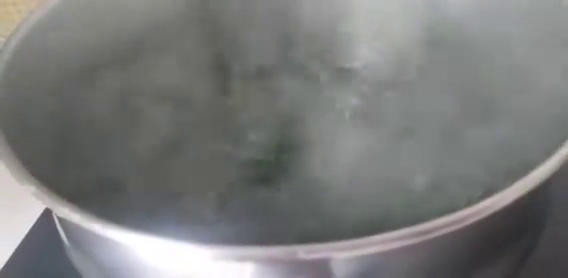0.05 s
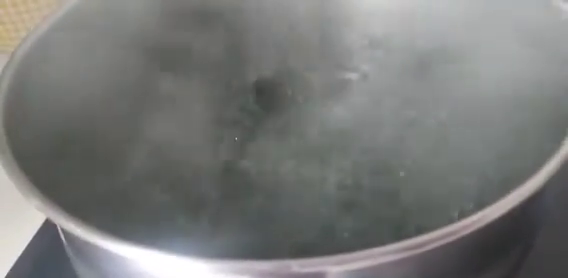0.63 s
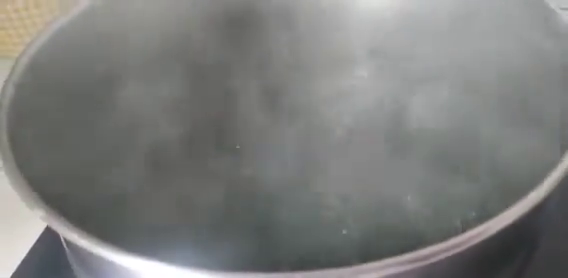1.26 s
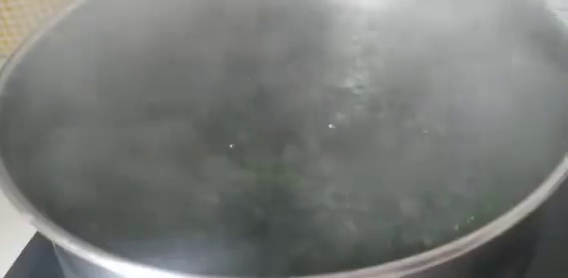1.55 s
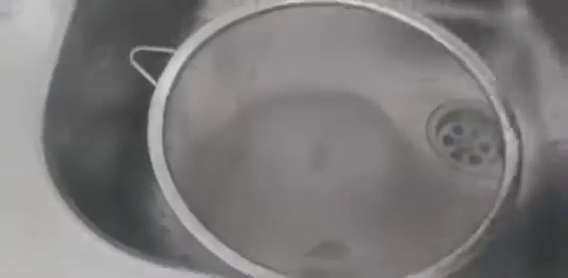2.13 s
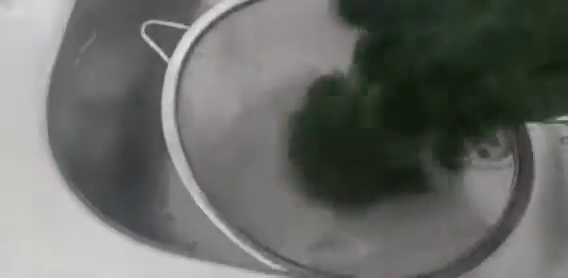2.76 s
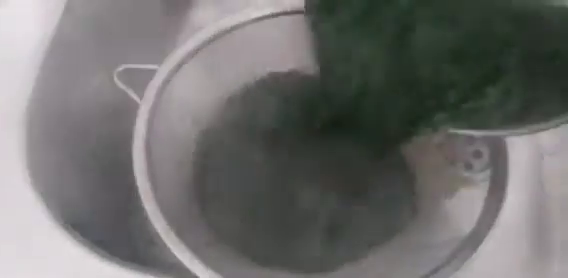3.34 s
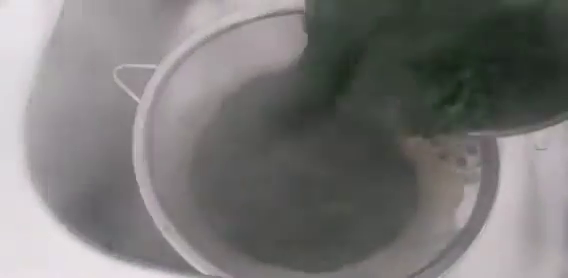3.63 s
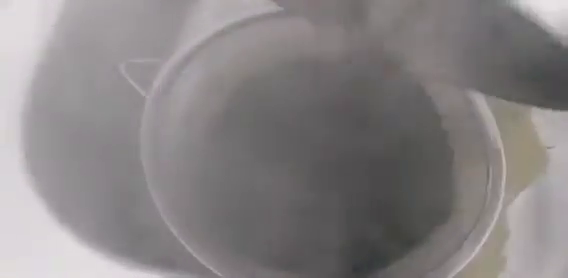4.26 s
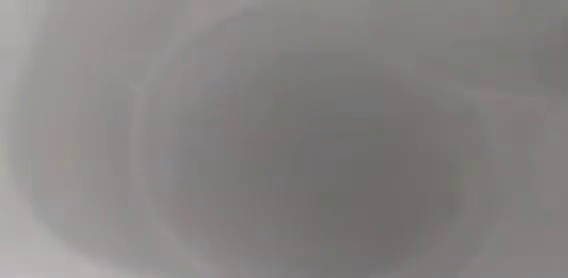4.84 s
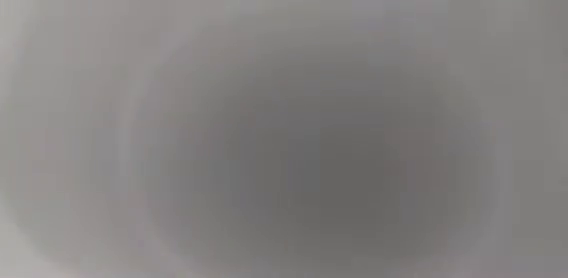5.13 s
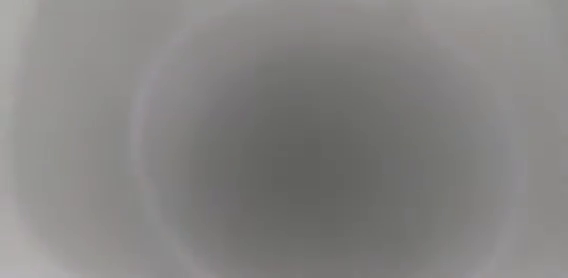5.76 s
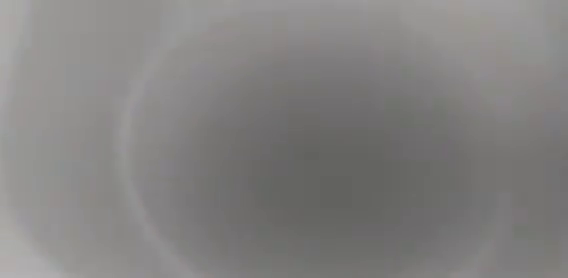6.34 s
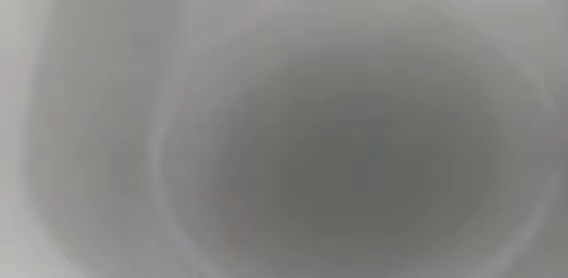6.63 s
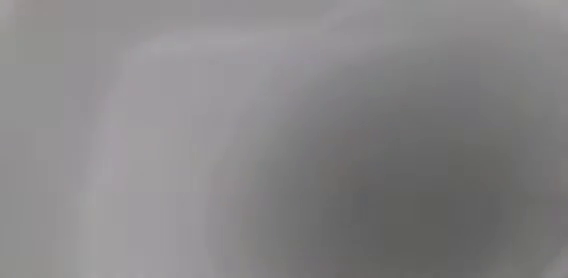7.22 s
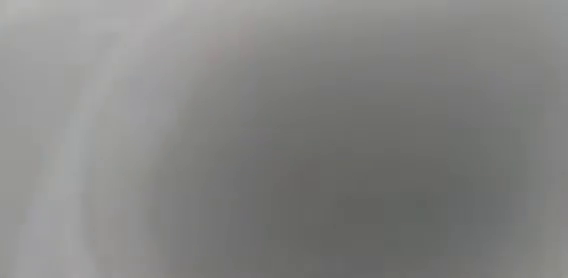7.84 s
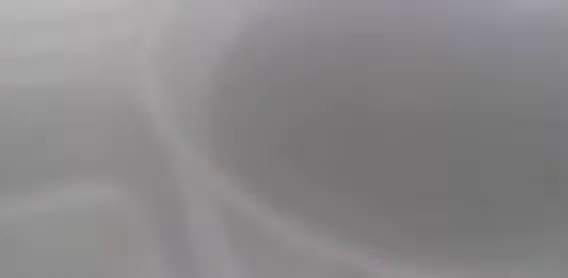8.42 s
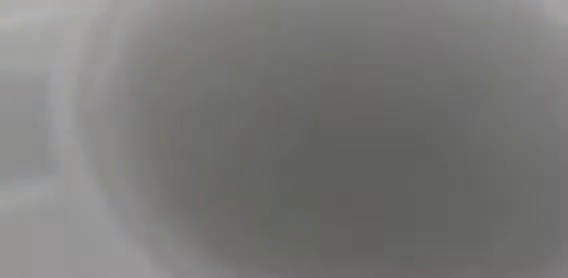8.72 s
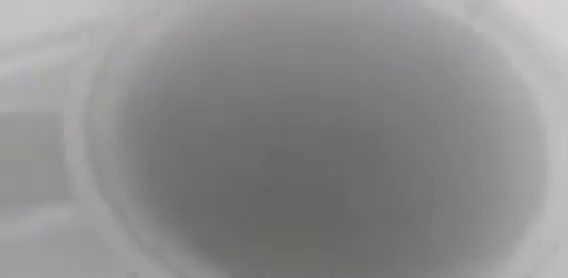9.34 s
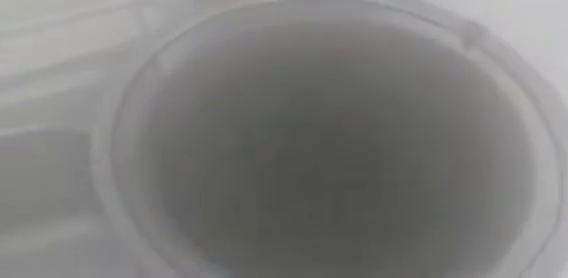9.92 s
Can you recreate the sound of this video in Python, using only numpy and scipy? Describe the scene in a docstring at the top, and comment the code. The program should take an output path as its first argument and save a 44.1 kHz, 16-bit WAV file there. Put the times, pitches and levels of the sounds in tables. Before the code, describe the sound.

Greens boil softly in a steel pot, fizzing and popping. The sound cuts to a kitchen sink with a low motor hum. Wet leaves slap and squelch into a colander, and water gurgles down the drain. The empty pot lands with a loud, ringing double clang. The colander knocks a few times, then scrapes and bumps along the sink as water trickles. Everything sounds close, with a little room echo.

```python
"""Spinach boils hard in a steel pot, fizzing, rumbling and popping as its bubbles ring and burst.
The scene changes to a sink in a humming kitchen: wet leaves slap into a colander and water gurgles away.
The empty pot lands with a clang, its modes ringing so loudly that the gain control ducks.
Then the colander is tapped, shaken and dragged, and impact and friction excite the steel's resonances."""
import sys
import numpy as np
from scipy import signal
from scipy.fft import rfft, irfft
from scipy.io import wavfile
from scipy.ndimage import uniform_filter1d

SR = 44100
rng = np.random.default_rng(int(sys.argv[2]) if len(sys.argv) > 2 else 0)


def dump_mix(stems):
    """Bounce the given channels to the path in sys.argv[1] as a 16-bit WAV at rate SR."""
    frames = np.atleast_2d(stems).T  # one column per channel
    limited = np.clip(frames, -1, 1)  # hard clip at full scale
    pcm = np.round(limited * 32767).astype(np.int16)
    wavfile.write(sys.argv[1], SR, pcm)


N = 440100
TIME = np.arange(N) / SR
BOIL_END_S, SINK_START_S = 1.978, 2.075


def undb(db):
    """Decibels to amplitude ratio."""
    return 10 ** (np.asarray(db) / 20)


def unit(x):
    """Normalise to an rms of one."""
    return x / np.sqrt(np.mean(x ** 2) + 1e-18)


def curve(rows):
    """Amplitude envelope through (s, dB) points, silent outside them."""
    s, db = np.transpose(rows)
    return undb(np.interp(TIME, s, db, left=-np.inf, right=-np.inf))


def shape(f, points):
    """Spectral envelope through (Hz, dB) points, as gain at frequencies f."""
    hz, db = np.transpose(points)
    return undb(np.interp(np.log(f + 1), np.log(hz), db))


def resonance(f, hz, width):
    """Complex response of a damped oscillator, gain one at its centre."""
    return 1j * f * width / (hz ** 2 - f ** 2 + 1j * f * width)


def colour(x, response):
    """Filter x by a frequency response and normalise it."""
    return unit(irfft(rfft(x) * response(np.fft.rfftfreq(len(x), 1 / SR)), len(x)))


def walk(rate_hz, samples=N):
    """Low-passed noise: a smooth random wander with an rms of one."""
    return colour(rng.standard_normal(samples), lambda f: np.exp(-f / rate_hz))


def fade(t, t60):
    """Exponential decay of 60 dB in t60 seconds."""
    return np.exp(-np.log(1000) * t / t60)


def add(track, s, sound):
    """Superpose a sound on the track from time s."""
    start = int(s * SR)
    track[start:start + len(sound)] += sound[:N - start]


def burst(response, t60, rise, grain_db=0):
    """Many tiny impacts merge into decaying, filtered noise whose onset has an rms near one."""
    t = TIME[:SR // 2]
    noise, size = rng.standard_normal((2, len(t)))
    clumps = undb(grain_db * np.tanh(np.repeat(size, 30)[:len(t)]))
    envelope = fade(t, t60) * (1 - np.exp(-t / rise))
    cloud = colour(noise * clumps, response) * envelope
    return cloud * np.linalg.norm(envelope) / envelope.max() / np.linalg.norm(cloud)


def bubbles(rate, low_hz, high_hz, cycles, spread_db, glide, seconds=N / SR):
    """Bubble resonance: each random gas pocket rings as a damped sine of rising pitch."""
    out = np.zeros(N)
    for when, pitch, size, life in rng.random((int(rate * seconds), 4)):
        hz = low_hz * (high_hz / low_hz) ** pitch
        t60 = cycles * (.5 + life) / hz
        t = TIME[:int(t60 * SR) + 2]
        gain = undb(-spread_db * np.log(max(size, .02)))
        phase = 2 * np.pi * hz * t * (1 + glide * t / t60)
        add(out, when * seconds, gain * fade(t, t60) * np.sin(phase))
    return unit(out) * np.sqrt(seconds * SR / N)


def crackle(rate, spread_db, smear_t60):
    """Shot noise: random clicks of uneven size, each with a short noisy tail."""
    clicks = (rng.random(N) < rate / SR) * rng.choice([-1, 1], N)
    clicks = clicks * undb(spread_db * np.minimum(rng.exponential(size=N), 4))
    energy = signal.fftconvolve(clicks ** 2, fade(TIME[:2048], smear_t60) ** 2)[:N]
    tails = np.sqrt(abs(energy)) * rng.standard_normal(N)
    return unit(unit(clicks) + unit(tails))


def scatter(start, end, rate, db, hz, spread_db=1.5, octaves=0.56):
    """A jittered train of events, as rows of (s, dB, Hz) around a typical level and pitch."""
    chance = rng.random((int((end - start) * rate), 3))
    return [(start + (k + late) / rate, db + spread_db * (1 - 2 * soft),
             hz * 2 ** (octaves * (2 * pitch - 1))) for k, (late, soft, pitch) in enumerate(chance)]


def room(x, wet_db, t60):
    """Reverberation: reflections from hard walls close by add a diffuse tail."""
    t = TIME[:SR // 2]
    tail = rng.standard_normal(len(t)) * fade(t, t60) * (1 - np.exp(-t / 0.0015))
    return x + undb(wet_db) * signal.fftconvolve(x, tail / np.linalg.norm(tail))[:N]


# Spectrum of the boiling. Each row: frequency in Hz, level in dB.
BOIL_SPECTRUM = [(18, -45), (30, -13), (103, 15.5), (184, -1), (303, 8), (345, -4.5), (632, 3), (988, -6.5),
                 (1430, 1.5), (1810, -6.5), (5040, -9.5), (6550, -10.5), (8740, -34), (16000, -26.5)]
# The biggest steam bubbles bursting. Each row: start in seconds, relative level in dB, centre in Hz.
STEAM_POPS = [(0.078, -35.5, 1450), (0.202, -35.5, 6050), (0.223, -32.5, 1770), (0.324, -26.5, 2900),
              (0.425, -31.5, 2280), (0.452, -34, 6500), (0.523, -29.5, 1320), (0.859, -29.5, 1670),
              (1.037, -35.5, 1600), (1.141, -34.5, 5530), (1.202, -36.5, 5500), (1.326, -32.5, 1400),
              (1.42, -32, 1400), (1.772, -36.5, 4400), (1.796, -35, 1500), (1.931, -34, 985)]

def boiling(fizz_db=-51, surge_db=2, simmer_db=-50, spatter_db=-69, pop_db=1):
    """Bubble resonance: tiny bubbles fizz, larger ones ring, droplets spatter and the biggest burst."""
    froth = bubbles(4200, 46.7, 15000, cycles=2.2, spread_db=-0.5, glide=0.062, seconds=BOIL_END_S)
    # small bubbles die sooner and spread over more treble; weighting by frequency evens that out
    fizz = colour(froth, lambda f: f * shape(f, BOIL_SPECTRUM)) * undb(surge_db * walk(36))
    simmer = bubbles(200, 1000, 6000, cycles=24, spread_db=3.6, glide=.04, seconds=BOIL_END_S)
    spatter = bubbles(49, 7100, 15000, cycles=21, spread_db=5.5, glide=.03, seconds=BOIL_END_S)
    out = undb(fizz_db) * fizz + undb(simmer_db) * simmer + undb(spatter_db) * spatter
    small_pops = scatter(0, BOIL_END_S, rate=11, db=-38, hz=2610, octaves=1)
    for s, db, hz in STEAM_POPS + small_pops:
        spit = burst(lambda f: shape(f, BOIL_SPECTRUM) * (0.096 + resonance(f, hz, 0.42 * hz)),
                     t60=0.05, rise=0.00081, grain_db=-0.5)
        add(out, s, undb(db + pop_db) * spit)
    return room(out, wet_db=-5.5, t60=0.034)


# Partials of a kitchen motor. Each row: frequency in Hz, rms level in dB.
MOTOR_PARTIALS = [(100, -45), (157.5, -57.5), (200, -61), (316.5, -55), (474, -67.5)]
# Spectrum of the room's air. Each row: frequency in Hz, level in dB.
AIR_SPECTRUM = [(18, -54.5), (30, -45), (43, -14), (71, -18), (103, 3), (204, -21), (319, -1.5),
                (404, -12.5), (473, -14.5), (1590, -29.5), (3670, -27), (6550, -33.5), (8520, -53),
                (16000, -40.5)]

def kitchen(air_db=-52, waver_db=1):
    """Slow amplitude and phase modulation make a motor's hum waver over broadband room noise."""
    out = undb(air_db) * colour(rng.standard_normal(N), lambda f: shape(f, AIR_SPECTRUM))
    for hz, db in MOTOR_PARTIALS:
        amplitude = np.sqrt(2) * undb(db + waver_db * walk(6))
        out += amplitude * np.sin(2 * np.pi * hz * TIME + walk(7.2) * hz / 700)
    return out


# Spectrum of the wet leaves. Each row: frequency in Hz, level in dB.
WET_SPECTRUM = [(150, -30), (330, -5.5), (600, -0.5), (1200, -12), (1900, -3.5), (3000, -7.5), (5000, 0),
                (6700, 0.5), (8000, -15), (9500, -17), (14000, -8.5), (16000, -14)]
# Heavy clumps landing. Each row: start in seconds, level in dB, centre in Hz, t60 in seconds.
LEAF_SPLATS = [(2.567, -41.5, 4320, 0.66), (2.714, -31, 8700, 0.21), (2.734, -26.5, 4670, 0.14),
               (2.844, -33, 3800, 0.11), (2.916, -20.5, 7030, 0.031), (2.935, -19.5, 2240, 0.064),
               (2.963, -13.5, 4070, 0.024), (3.015, -29, 5030, 0.16), (3.153, -33, 3300, 0.12),
               (3.187, -20, 3340, 0.032), (3.243, -27, 1370, 0.15), (3.262, -21.5, 3500, 0.026),
               (3.319, -28.5, 3960, 0.093), (3.331, -25.5, 9650, 0.024), (3.422, -25.5, 3950, 0.062),
               (3.464, -21, 5530, 0.026), (3.555, -33, 2300, 0.089), (3.601, -30.5, 2500, 0.17),
               (3.779, -33, 9600, 0.024), (3.871, -30.5, 3860, 0.078), (3.935, -22.5, 3980, 0.03),
               (4.027, -28, 7150, 0.031), (4.21, -24.5, 6200, 0.048), (4.982, -34.5, 5230, 0.022),
               (8.219, -30.5, 4750, 0.11)]
# Two crackle envelopes: the leaves slide out, and later the colander is moved.
# Each row: time in seconds, relative level in dB.
CRACKLE_ENVELOPES = [
    [(2.6, -53), (2.76, -44.5), (3.08, -44.5), (3.43, -45), (3.67, -54), (4.16, -46), (4.38, -57),
     (5.3, -64)],
    [(7.3, -68.5), (7.95, -57.5), (8.24, -48), (8.39, -50), (8.63, -48), (8.87, -64), (9.46, -64.5),
     (9.97, -52)],
]
# Stretches in which small shreds drop. Each row: start and end in seconds.
SHRED_SPANS = [(2.75, 3.7), (7.98, 8.22)]

def leaves(tick_db=-4, squelch_db=-7):
    """Damped impacts: wet clumps and shreds slap down while leaves crackle and trapped air squelches."""
    def slap(hz, t60):
        return burst(lambda f: shape(f, WET_SPECTRUM) * (0.54 + resonance(f, hz, 0.6 * hz)),
                     t60, rise=0.00035, grain_db=4)

    ticks = colour(crackle(rate=500, spread_db=4, smear_t60=0.058), lambda f: shape(f, WET_SPECTRUM))
    squelch = bubbles(410, 2300, 7000, cycles=26, spread_db=4, glide=.04)
    out = undb(tick_db) * ticks + undb(squelch_db) * squelch
    for start, end in SHRED_SPANS:
        for s, db, hz in scatter(start, end, rate=14, db=11.5, hz=3180):  # dB above the envelope
            add(out, s, undb(db) * slap(hz, t60=0.06))
    out *= sum(curve(rows) for rows in CRACKLE_ENVELOPES)
    for s, db, hz, t60 in LEAF_SPLATS:
        add(out, s, undb(db) * slap(hz, t60))
    return room(out, wet_db=-9.5, t60=0.17)


# Two envelopes of water running into the drain. Each row: time in seconds, relative level in dB.
FLOW_ENVELOPES = [
    [(2.6, -53.5), (3.1, -52.5), (3.84, -63), (4.57, -48.5), (4.91, -60), (5.28, -52)],
    [(7.2, -60), (7.358, -62.5), (7.612, -58.5), (7.926, -52.5), (8.048, -51), (8.36, -52.5)],
]
# Gulps of air. Each row: start in seconds, relative level in dB, first pitch in Hz, length in seconds.
AIR_GULPS = [(4.479, -44, 1290, 0.022), (4.532, -44, 990, 0.02), (4.585, -34.5, 1060, 0.019),
             (4.747, -34, 608, 0.017), (4.936, -35, 573, 0.02), (4.953, -36.5, 1907, 0.012),
             (5.02, -39, 520, 0.024), (5.091, -39, 490, 0.022), (5.133, -40.5, 826, 0.017),
             (5.216, -40, 472, 0.042), (5.257, -47, 1900, 0.013), (8.877, -48, 2900, 0.015)]

def drain(trickle_db=-4, gulp_db=-1, octaves_per_s=22):
    """Water trickles and the sink rumbles; each gulp's resonance rises as its air pocket closes."""
    flow = sum(curve(rows) for rows in FLOW_ENVELOPES)
    out = undb(trickle_db) * flow * bubbles(600, 400, 3200, cycles=12, spread_db=2, glide=.08)
    for s, db, start_hz, length in AIR_GULPS:
        progress = np.linspace(0, 1, int(length * SR))
        hz = start_hz * 2 ** (octaves_per_s * length * progress)
        wobble = 1 + .35 * walk(250, SR // 10)[:len(progress)]
        gulp = np.sin(np.pi * progress) * wobble * np.sin(2 * np.pi * np.cumsum(hz) / SR)
        add(out, s, undb(db + gulp_db) * gulp)
    rumble = colour(rng.standard_normal(N), lambda f: resonance(f, 130, 290) ** 2)
    return room(out, wet_db=-6.5, t60=0.33) + flow * rumble


# Bumps on the sink floor.
# Each row: start in seconds, relative level in dB, centre and bandwidth in Hz, t60 in seconds.
FLOOR_BUMPS = [(2.708, -31.5, 320, 34, 0.32), (8.396, -40.5, 427, 370, 1), (8.485, -31.5, 400, 295, 0.17),
               (8.539, -24, 350, 209, 0.076), (8.667, -31.5, 403, 390, 0.07), (8.72, -44, 428, 447, 0.35),
               (9.093, -48, 330, 150, 0.058)]

def sink_floor(bump_db=1):
    """Plate resonance: the sink floor answers each blow with a dull band of decaying noise."""
    out = np.zeros(N)
    for s, db, hz, width, t60 in FLOOR_BUMPS:
        add(out, s, undb(db + bump_db) * burst(lambda f: resonance(f, hz, width) ** 2, t60, rise=.007))
    return room(out, wet_db=-5, t60=0.27)


# Modes of the pot. Each row: frequency in Hz, t60 in seconds for a blow on the rim,
# relative level in dB when the base strikes, and when the rim strikes.
POT_MODES = [(160, .28, -22, -25), (222, .33, -19, -19), (323, .2, -5, -31), (454, .28, -48, -18),
             (477, .35, -30, -25), (544, .42, -29, -20), (678, .4, -32, -26), (720, .33, -40, -26),
             (762, .4, -30, -28), (829, .38, -49, -25), (1260, .27, -29, -27), (1478, .3, -45, -18),
             (1509, .35, -36, -25), (2295, .28, -26, -29), (2325, .32, -23, -24), (2668, .33, -33, -25),
             (3385, .29, -56, -23), (3490, .36, -28, -21), (3533, .2, -8, -34), (4445, .3, -26, -22),
             (4790, .33, -33, -22), (5740, .28, -25, -26), (6770, .24, -26, -30), (7548, .22, -33, -42)]
# The pot lands. Each row: start in seconds, ring gain in dB, contact (0 base, 1 rim), clash level in dB.
POT_LANDINGS = [(5.33, 15, 0.18, -4), (5.406, 7.5, 0.23, -6), (5.624, 14, 0.98, 4), (5.644, -1, 0.55, -4.5)]
# Spectrum of clashing sheet steel. Each row: frequency in Hz, level in dB.
CLASH_SPECTRUM = [(25, -50), (45, -28.5), (70, 3), (110, -2.5), (160, -4), (220, 5.5), (270, -8),
                  (450, 1.5), (750, 4), (950, -7.5), (1500, -7.5), (2050, -11.5), (2600, -5), (3050, -16.5),
                  (3500, -8), (4900, -6), (7000, -15.5), (8500, -43), (16000, -43.5)]

def pot(clash_t60=0.31, crack_db=-17, base_damping=0.11, rattle=0.3):
    """Modal vibration: the contact point weights the pot's modes, over a clash and a bright crack."""
    out, t = np.zeros(N), TIME[:SR]
    attack = 1 - np.exp(-t / 0.0015)
    for s, ring_db, contact, clash_db in POT_LANDINGS:
        life = 1 - base_damping * (1 - contact)  # a blow on the base dies sooner than one on the rim
        for hz, t60, base_db, rim_db in POT_MODES:
            flutter = 1 + rattle * walk(50, SR)  # the pot rocks against the sink
            mode = flutter * attack * fade(t, t60 * life) * np.sin(2 * np.pi * (hz * t + rng.random()))
            add(out, s, undb(ring_db + base_db + contact * (rim_db - base_db)) * mode)
        clash = burst(lambda f: shape(f, CLASH_SPECTRUM), clash_t60 * life, rise=0.00068, grain_db=2.5)
        crack = burst(lambda f: shape(f, WET_SPECTRUM), t60=0.094, rise=0.00018)
        add(out, s, undb(clash_db) * clash + undb(ring_db + crack_db) * crack)
    return room(out, wet_db=-17, t60=0.59)


# The colander knocks on the sink. Each row: start in seconds, level in dB, t60 in seconds.
COLANDER_TAPS = [(6.228, -47, 0.062), (6.351, -22, .055), (6.415, -40, 0.17), (6.493, -21, 0.032),
                 (6.555, -36.5, 0.077), (6.907, -18.5, 0.06), (6.93, -45.5, 0.77), (7.01, -41.5, 0.7),
                 (7.107, -33.5, 0.097), (9.495, -52, 0.073)]
# Spectrum of a knock. Each row: frequency in Hz, level in dB.
KNOCK_SPECTRUM = [(150, -24.5), (330, -3), (520, -16), (720, -3.5), (950, -10), (1300, -10), (4800, -10.5),
                  (7000, -11), (8700, -31.5), (16000, -23.5)]
# Modes of the colander. Each row: frequency and bandwidth in Hz, weight in dB (halved when played).
COLANDER_MODES = [(700, 89, -5.5), (1360, 54, -2), (1913, 36, -15), (3250, 35, -21), (3970, 45, -10),
                  (4950, 69, -6), (5800, 25, -16)]
# Shoves along the sink. Each row: time of the peak in seconds, level in dB, seconds to swell by 60 dB.
COLANDER_SHOVES = [(8.402, -34.5, 0.15), (8.508, -36, 0.4), (8.675, -45.5, 0.1), (8.78, -51, 0.16)]
# Resonances that rubbing excites. Each row: frequency and bandwidth in Hz, relative level in dB.
FRICTION_MODES = [(1498, 63, -9.5), (2690, 110, -6), (3530, 75, -2), (4520, 190, -2), (5400, 510, -15),
                  (6820, 1200, -8), (7450, 260, -2)]

def colander(ring_db=7, scrape_t60=0.14):
    """Impact and friction excite resonances: the colander knocks, then scrapes along the sink."""
    def knocked(f):
        modes = sum(undb(db / 2) * resonance(f, hz, width) for hz, width, db in COLANDER_MODES)
        return shape(f, KNOCK_SPECTRUM) * (1 + undb(ring_db) * modes)

    def rubbed(f):
        modes = sum(undb(db) * resonance(f, hz, width) ** 2 for hz, width, db in FRICTION_MODES)
        return 0.37 * shape(f, WET_SPECTRUM) + modes

    shoves = sum(undb(db) * fade(abs(TIME - s), np.where(TIME < s, swell, scrape_t60))
                 for s, db, swell in COLANDER_SHOVES)
    out = shoves * colour(crackle(rate=1500, spread_db=-2, smear_t60=0.0076), rubbed)
    for s, db, t60 in COLANDER_TAPS:
        add(out, s, undb(db) * burst(knocked, t60, rise=0.0019, grain_db=6))
    return room(out, wet_db=-5, t60=0.27)


# Treble difference between the microphone's two ports.
# Each row: frequency in Hz, side relative to mid in dB before the bearing scales it.
SIDE_SPECTRUM = [(500, -50), (2400, -43), (4500, -22), (8000, -10), (15000, -11)]

def scene():
    """Superposition in mid-side stereo: the stove, a moment of silence, then the sink."""
    at_stove = np.clip((BOIL_END_S - TIME) / 0.0078, 0, 1)
    at_sink = np.clip((TIME - SINK_START_S) / 0.0015, 0, 1)
    mid = at_stove * boiling()
    mid += at_sink * (kitchen() + leaves() + drain() + sink_floor() + pot() + colander())
    bearing = .85 + .5 * walk(40)  # each tick comes from its own direction
    ports = shape(np.fft.rfftfreq(N, 1 / SR), SIDE_SPECTRUM) * np.exp(1.3j)
    side = bearing * irfft(rfft(mid) * ports, N)
    return np.array([mid + side, mid - side])


def record(dry, threshold_db=-7.5, release_db_per_s=11, cutoff_hz=16000):
    """Automatic gain control ducks at once and recovers slowly; saturation and a low-pass follow."""
    power = uniform_filter1d(np.mean(dry ** 2, axis=0), size=256)
    over_db = 10 * np.log10(np.maximum(power, 1e-12)) - threshold_db
    recovery_db = release_db_per_s * TIME
    duck_db = np.maximum(np.maximum.accumulate(over_db + recovery_db) - recovery_db, 0)
    rounded = np.tanh(dry * undb(-duck_db))
    return signal.sosfilt(signal.ellip(8, .2, 70, cutoff_hz, fs=SR, output="sos"), rounded)


dry = scene()
out = record(dry)
dump_mix(out)
```